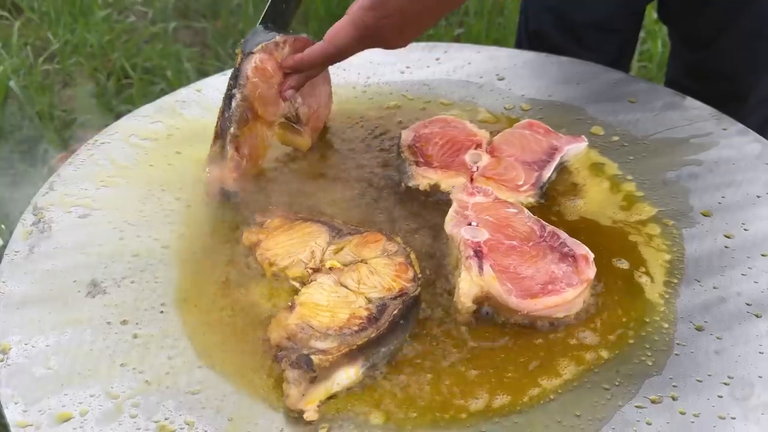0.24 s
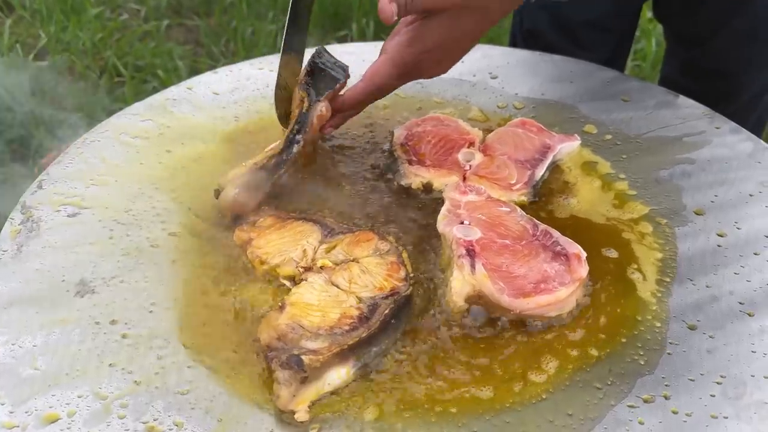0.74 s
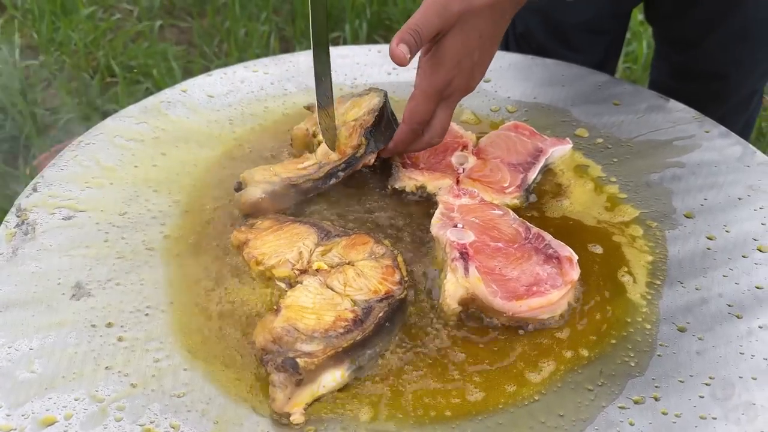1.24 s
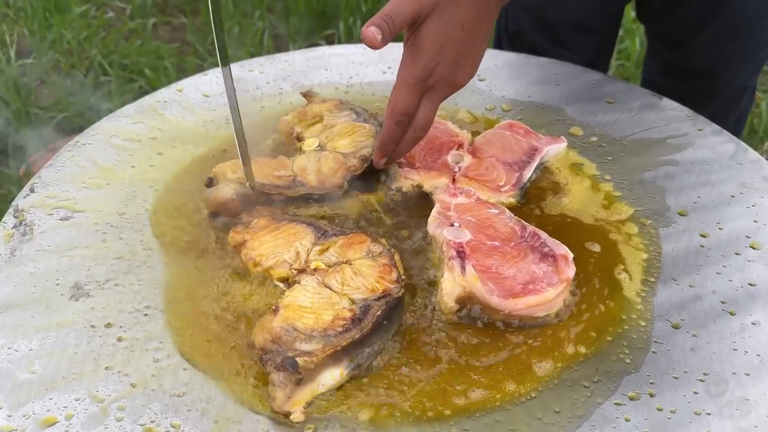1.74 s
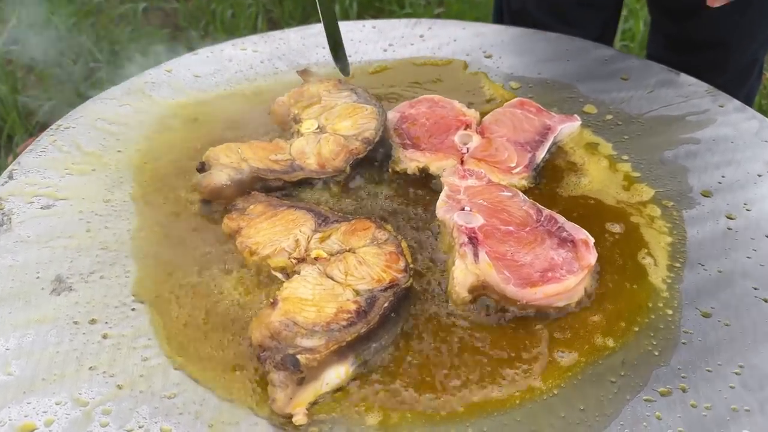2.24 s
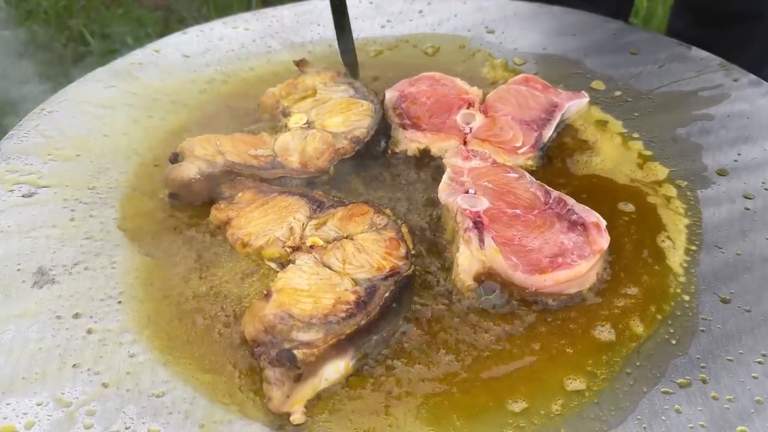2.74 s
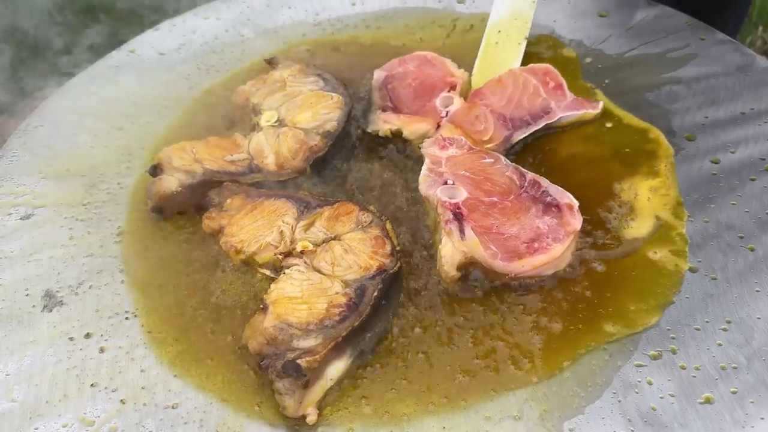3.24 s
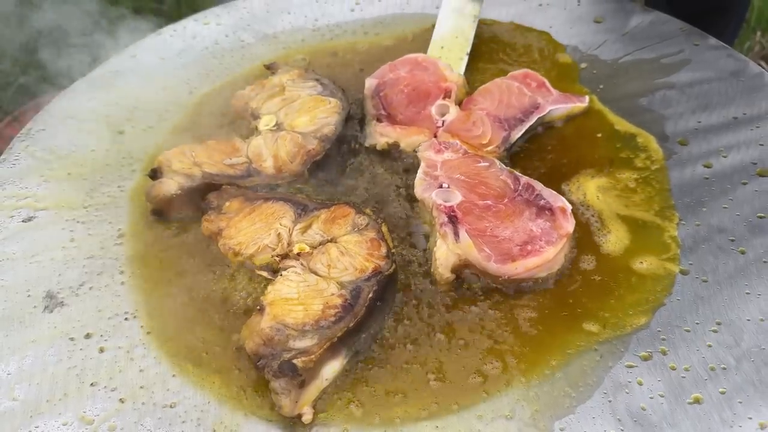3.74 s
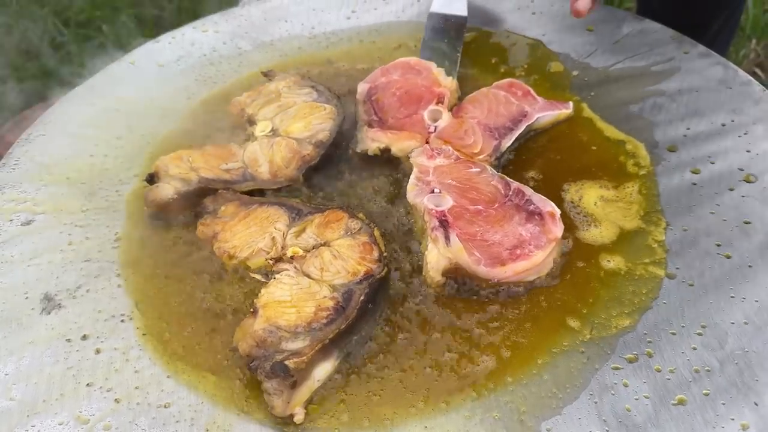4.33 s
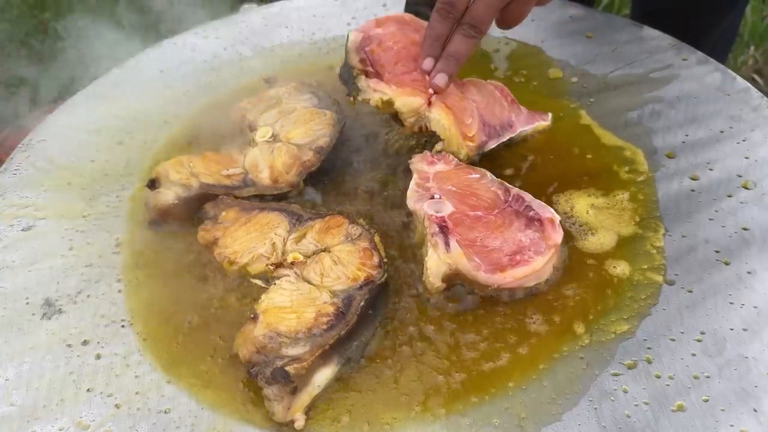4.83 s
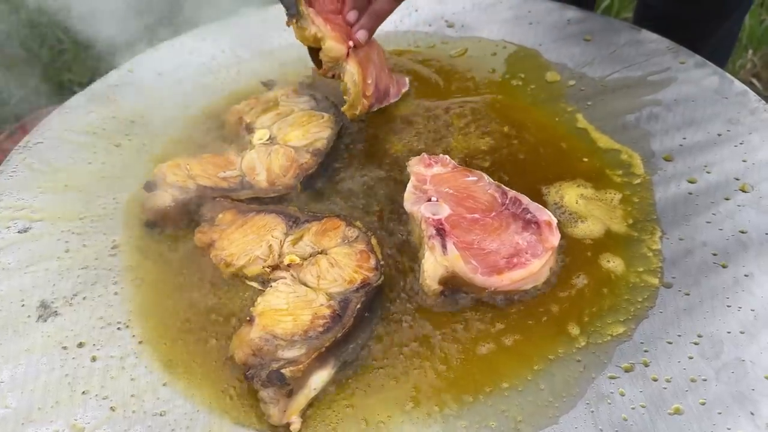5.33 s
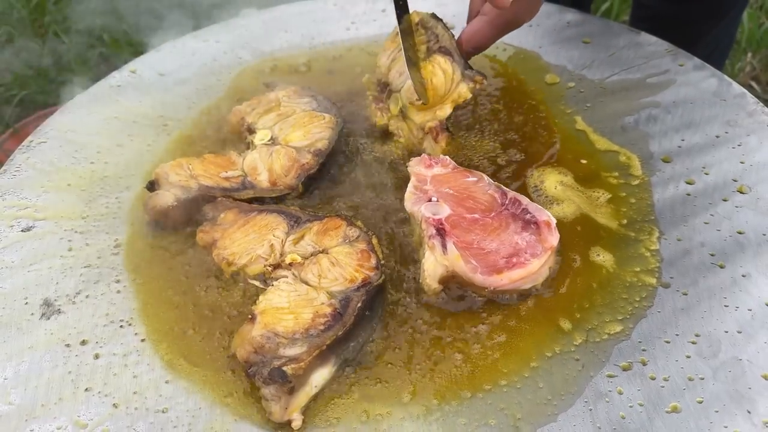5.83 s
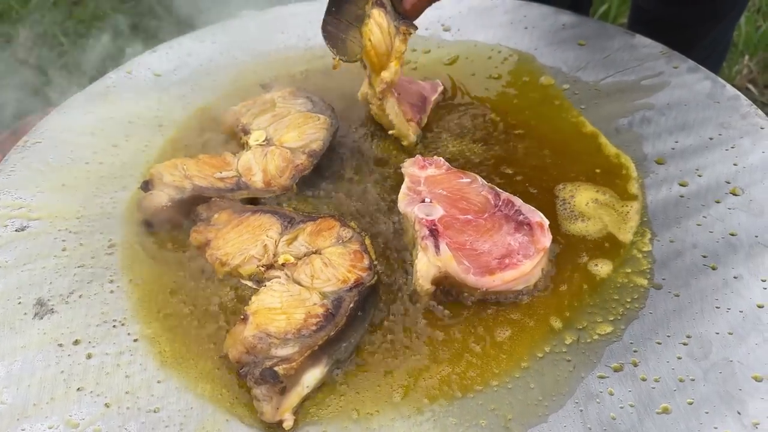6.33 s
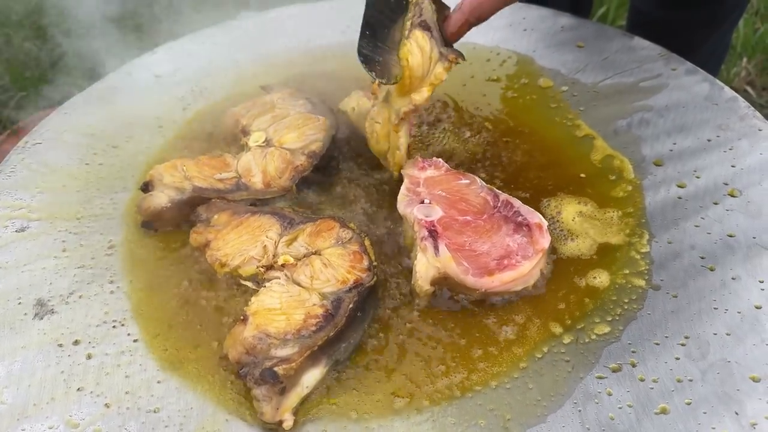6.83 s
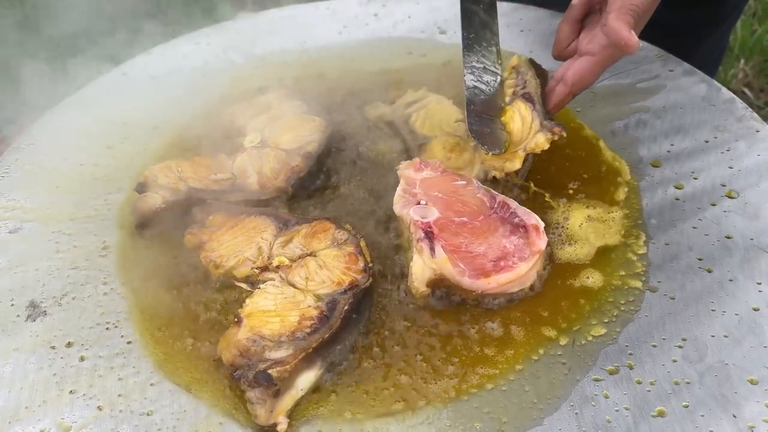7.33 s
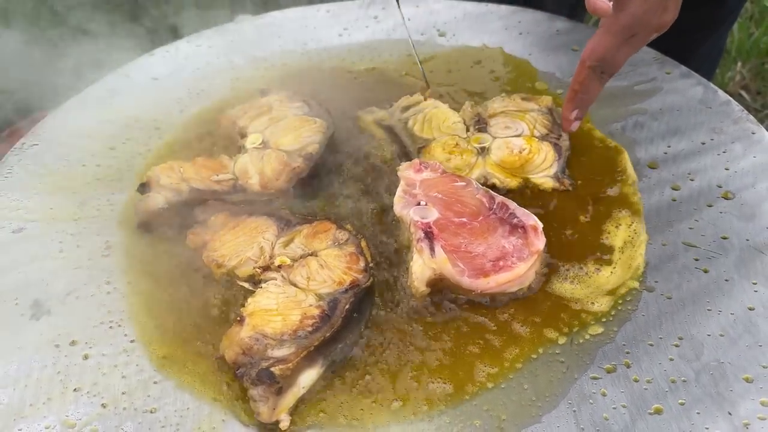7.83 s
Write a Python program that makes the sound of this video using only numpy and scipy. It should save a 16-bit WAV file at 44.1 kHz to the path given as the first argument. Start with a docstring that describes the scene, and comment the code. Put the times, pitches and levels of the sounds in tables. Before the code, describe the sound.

Fish steaks fry in hot oil on an outdoor iron griddle, heard from close by. A dense, bubbling sizzle holds steady for all eight seconds, strongest in the midrange, with a faint high hiss and tiny pings above it. Small wet pops stand out irregularly, many each second, and the bubbling is a little more gurgly around 1 to 1.5 seconds. Oil spits in sharp, bright ticks, mostly during the first 3 seconds, then sparsely, with another cluster from about 7.2 to 7.7 seconds. Light wind buffets the microphone underneath with a low rumble and flutter, swelling into soft thumps around 0.2 to 0.7 seconds, near 1.8, from 4 to 5.3 and around 6.3 seconds. The whole sound dips for an instant at about 0.1 seconds and again at 2.9, fading straight back in. The frying continues to the end.

```python
"""Outdoors at an iron griddle, fish steaks fry in hot oil, close to two microphone ports.
Thousands of steam bubbles burst each second. A few pop out with a wet tail, oil spits, and faint high
pings dot the sizzle, which nearby reflections colour. Wind buffets the ports with rumble, flutter and
soft thumps, under a faint high hiss. Twice the sound drops out for an instant and fades back in."""
import sys
import numpy as np
from scipy import signal
from scipy.fft import rfft, irfft, next_fast_len
from scipy.io import wavfile
from scipy.ndimage import uniform_filter1d

SR = 44100
rng = np.random.default_rng(int(sys.argv[2]) if len(sys.argv) > 2 else 0)


def transcribe(signal):
    """Save signal, clipped to [-1, 1], as a 16-bit WAV file at the path in sys.argv[1]."""
    frames = np.atleast_2d(signal).T
    limited = np.clip(frames, -1, 1)
    pcm = np.round(limited * 32767).astype(np.int16)
    wavfile.write(sys.argv[1], SR, pcm)


N = 355887
FFT_SIZE = next_fast_len(N, True)
HZ = np.fft.rfftfreq(FFT_SIZE, 1 / SR)

# Sizzle fader rides, each taken about its own mean: (time [s], boil [dB], fizz [dB], gurgle [dB])
SIZZLE_RIDES = [(0.0, -23.5, -36.5, -34.5), (0.3, -26.5, -38.5, -31.5), (0.95, -25, -38.5, -31.5),
                (1.06, -26, -39.5, -31.5), (1.15, -25, -39, -30), (1.32, -26.5, -39.5, -32.5),
                (1.5, -25.5, -39.5, -33.5), (1.75, -26.5, -41, -36), (2.1, -26.5, -39.5, -36.5),
                (2.3, -24.5, -39.5, -36), (2.45, -25, -38.5, -37.5), (2.6, -27, -40.5, -36),
                (2.75, -24.5, -39, -36), (2.92, -25, -39.5, -34), (3.0, -26, -37.5, -35.5),
                (3.3, -25.5, -38.5, -35), (3.6, -27, -38, -34.5), (4.0, -27, -39, -34),
                (4.5, -27.5, -38, -35.5), (5.0, -26.5, -38, -35), (5.6, -25.5, -39, -33),
                (6.2, -26.5, -39, -35.5), (6.9, -27, -40, -34.5), (7.5, -27, -39, -36),
                (8.07, -26, -38, -32)]
# Tone of the sizzle at each port: (frequency [Hz], relative level [dB])
LEFT_EQ = [(300, -20.5), (450, -15), (950, -9), (1170, -5), (1300, -1.5), (1650, 0.63), (2100, -5),
           (2800, -9.5), (4000, -17.5), (6000, -22.5), (6500, -23), (6950, -21), (7150, -25), (7800, -24.5),
           (9000, -35.5), (9900, -44.5), (11000, -58.5)]
RIGHT_EQ = [(300, -24), (450, -17), (950, -9.5), (1170, -7), (1300, -3), (1750, 1.3), (2300, -1.5),
            (2900, -9), (4000, -16.5), (6000, -25), (6500, -20), (6950, -23.5), (7150, -23), (7900, -24),
            (8100, -23.5), (9800, -33), (11000, -55.5)]
# How much sizzle the ports share: (frequency [Hz], correlation [0-1])
PORT_CORRELATION = [(450, 0.95), (1000, 0.92), (1400, 0.96), (1900, 0.87), (2400, 0.71), (3050, 0.84),
                    (3500, 0.51), (3900, 0.1), (4300, 0.42), (4750, 0), (5500, 0.53), (6800, 0.75),
                    (7800, 0.16), (8600, 0.51), (9600, 0.04)]
# Right port against left: (frequency [Hz], phase [rad])
PORT_PHASE = [(500, 0), (1000, -0.1), (1400, 0.23), (1800, 0.33), (2080, 0.6), (2250, 0.2), (2420, -1.3),
              (2600, -1.8), (2900, -2.5), (3150, -2.5), (3700, -2), (4300, -2), (5150, -5.5), (5700, -6),
              (6900, -9), (7750, -11.5), (8600, -12.5), (10000, -11.5)]
# Narrow tonal peaks from nearby reflections, before and after the microphone moves:
# (pitch before [Hz], pitch after [Hz], width [Hz], gain before [dB], gain after [dB])
REFLECTION_PEAKS = [(395, 389, 47, 3, 6), (501, 501, 22, -1, 3), (780, 783, 55, -1, 2),
                    (1354, 1200, 54, 0.5, 2), (1710, 2500, 83, 1, 0.1), (2350, 2300, 46, 1.5, 0.5),
                    (2600, 2600, 87, 2, -0.5), (3080, 3055, 90, 4, 2), (3470, 3400, 90, 4, 0.5),
                    (3746, 3630, 78, 3, 3.5), (4450, 4290, 60, 6.5, 3), (4600, 4521, 63, 3, 8),
                    (5140, 4960, 58, 7, 4), (5469, 5286, 63, 5.5, 7), (5830, 5690, 110, 1.5, 3.5),
                    (6070, 6065, 80, 4.5, 3), (6470, 6567, 110, 5, 3.5), (6740, 8600, 150, 2, 1.5)]
# The peaks slide as the hand-held microphone drifts: (time [s], pitch shift [%])
PEAK_DRIFT = [(0.0, 0.5), (0.8, 0.1), (1.6, -0.6), (2.3, -1), (2.93, -1.2), (2.95, -0.5), (3.6, -0.2),
              (4.8, 0.6), (6.1, 1.2), (7.2, 1.6), (8.07, 2.2)]
# Wind bed between gusts: (time [s], rumble level [dB], flutter level [dB])
WIND_BED = [(0.0, -44.5, -49), (0.54, -47, -46), (1.21, -49, -54.5), (1.64, -53, -51.5), (1.82, -48, -47),
            (1.98, -45.5, -48), (3.17, -51, -52), (3.98, -46.5, -48), (4.88, -44, -54.5),
            (5.21, -45.5, -50), (5.66, -52.5, -49.5), (6.38, -48, -50), (7.08, -54, -55.5),
            (8.07, -49.5, -46.5)]
# Gusts on top of the bed: (start [s], length [s], rumble level [dB], flutter level [dB])
WIND_GUSTS = [(0.116, 0.03, -48, -62), (0.213, 0.056, -38, -43), (0.293, 0.044, -48, -51),
              (0.434, 0.03, -45, -44), (0.46, 0.026, -39, -39), (0.533, 0.037, -38, -44),
              (0.653, 0.063, -42, -44), (0.788, 0.049, -39.5, -38), (0.856, 0.044, -39.5, -45),
              (1.21, 0.042, -41.5, -44.5), (1.269, 0.039, -43, -40.5), (1.352, 0.05, -42, -44),
              (1.394, 0.049, -40, -42), (1.668, 0.18, -38, -38), (1.943, 0.037, -51, -52),
              (2.04, 0.029, -42, -59), (2.255, 0.034, -45, -44), (2.457, 0.051, -42, -45),
              (2.726, 0.069, -41, -44), (2.9, 0.043, -42, -49), (4.089, 0.057, -35, -49),
              (4.198, 0.094, -38, -57), (4.358, 0.036, -43, -55), (4.66, 0.22, -39, -51),
              (4.972, 0.03, -47, -52), (5.073, 0.037, -37, -51), (5.156, 0.11, -39, -45.5),
              (5.312, 0.034, -46, -45), (6.26, 0.037, -41, -48), (6.344, 0.049, -37, -40),
              (6.403, 0.042, -47, -54)]
# Tone of the two wind layers and the hiss: (frequency [Hz], relative level [dB])
RUMBLE_EQ = [(12, -46.5), (25, -30), (42, -5), (58, 1), (95, 1.5), (150, -7.5), (260, -61)]
FLUTTER_EQ = [(90, -22.5), (140, 0), (220, -6.5), (330, -11), (550, -17), (900, -62.5)]
HISS_EQ = [(9500, -31.5), (11000, -7), (12000, -10), (15700, 3.5)]
# Bubbles that stand out: (time [s], level [dB], pitch [Hz], length [cycles])
BUBBLE_POPS = [(0.0142, -18, 1660, 4.4), (0.0648, -15.5, 1680, 5.0), (0.0843, -13, 1800, 4),
               (0.1087, -13, 1660, 5.5), (0.19, -15.5, 1960, 4.4), (0.2077, -12, 1540, 5.0),
               (0.324, -15, 1400, 2.9), (0.393, -7.5, 1620, 2.1), (0.4713, -15, 1700, 5.0),
               (0.5, -14, 1660, 7.8), (0.5131, -12.5, 1520, 5.6), (0.5327, -14, 1600, 5.4),
               (0.5958, -12, 1670, 5.6), (0.627, -14, 1610, 4.6), (0.723, -22, 1340, 4),
               (0.751, -13.5, 1230, 5.9), (0.769, -13, 1830, 5.8), (0.836, -8.5, 1480, 4.3),
               (0.919, -16, 1680, 5.0), (0.9775, -9, 1620, 5.0), (1.094, -14, 1760, 5.0),
               (1.0962, -13, 1900, 2.8), (1.0993, -14, 2100, 4.5), (1.118, -13, 1270, 12),
               (1.182, -13.5, 1130, 8.5), (1.2194, -12, 1630, 5.0), (1.2534, -12, 1590, 3.2),
               (1.2695, -9.5, 1570, 3.4), (1.287, -8, 1310, 5.4), (1.318, -13.5, 1410, 8.8),
               (1.3435, -18, 1440, 5.0), (1.365, -10.5, 1250, 5), (1.405, -8, 1620, 3.4),
               (1.426, -10, 1420, 4.8), (1.483, -13, 1650, 3.2), (1.512, -12, 1720, 6.2),
               (1.5411, -11, 1250, 6.2), (1.5753, -17, 1470, 3.3), (1.6452, -11.5, 1450, 5.6),
               (1.6928, -14.5, 1440, 6.5), (1.834, -11, 1590, 3.5), (1.9263, -14.5, 1420, 4.4),
               (1.944, -15, 1470, 5.0), (2.191, -16, 1980, 4.5), (2.2545, -18, 1730, 5.0),
               (2.33, -20, 1990, 3.4), (2.3943, -9, 1710, 4.2), (2.467, -13.5, 1720, 6.7),
               (2.5205, -13, 1610, 5.0), (2.6209, -13.5, 1390, 5.0), (2.677, -15.5, 1300, 4.8),
               (2.8075, -16, 1550, 4.6), (2.8563, -15, 1740, 5.0), (2.876, -14, 2240, 6.0),
               (2.9731, -16, 1750, 5.0), (3.0069, -15, 1390, 6.8), (3.0565, -15, 1680, 5.0),
               (3.194, -11.5, 1680, 6.7), (3.297, -12, 1350, 4.6), (3.348, -14, 1340, 5.4),
               (3.4754, -13.5, 1340, 5.6), (3.5564, -11.5, 1720, 5.0), (3.689, -12, 1530, 4.6),
               (3.7297, -14, 1510, 5.0), (3.8916, -20.5, 1870, 5.0), (4.0264, -17, 1600, 7.5),
               (4.1006, -14, 1710, 5.5), (4.142, -15, 1580, 5.8), (4.1695, -11.5, 1850, 3.5),
               (4.279, -13.5, 1640, 4), (4.4977, -19, 1790, 4.5), (4.578, -11.5, 2080, 5.0),
               (4.6108, -14.5, 1730, 6.6), (4.6863, -21, 1590, 5.0), (4.712, -16, 1610, 7.9),
               (4.739, -15.5, 1670, 4.6), (4.952, -13, 1680, 4.5), (5.008, -9.5, 1560, 4),
               (5.0977, -14, 1800, 5.0), (5.1598, -19, 1740, 4.5), (5.2056, -22, 1830, 3.6),
               (5.339, -19, 1750, 5.0), (5.468, -7.5, 1700, 5.0), (5.5543, -17.5, 1310, 4.4),
               (5.5937, -15.5, 1400, 3.7), (5.6261, -11.5, 1690, 5.0), (5.696, -22, 1780, 5.0),
               (5.7563, -15.5, 1790, 6.1), (5.8124, -14.5, 1700, 4.8), (5.905, -13.5, 1680, 8),
               (6.2007, -14, 1690, 3.5), (6.239, -11, 1680, 6), (6.4188, -14, 1720, 8),
               (6.4428, -17, 1500, 4.4), (6.4964, -11.5, 1840, 3.4), (6.5313, -17, 1660, 3.9),
               (6.5857, -13, 1670, 5.0), (6.61, -11.5, 1320, 5.0), (6.6884, -16.5, 1260, 5.5),
               (6.7332, -10.5, 1810, 3.9), (6.773, -18, 1360, 7.6), (6.838, -12, 1670, 4.5),
               (6.9453, -13, 1640, 5.4), (7.0, -21, 1800, 6.3), (7.147, -17, 1960, 6.9),
               (7.1608, -10, 1460, 4.6), (7.232, -10, 1590, 5.7), (7.3169, -14, 1970, 3.3),
               (7.5281, -11.5, 1640, 5.9), (7.5993, -14, 1790, 4.3), (7.6937, -14.5, 1655, 9.6),
               (7.9008, -12, 1630, 5.0)]
# Sudden dips in level: (time [s], depth [dB], recovery [s])
LEVEL_DIPS = [(0.093, 15.5, 0.034), (2.937, 16, 0.05)]
# Sharp spits of oil: (time [s], level [dB], pitch [Hz])
OIL_SPITS = [(0.1131, -27, 3850), (0.3915, -24, 3800), (0.5463, -23, 3810), (0.626, -15.5, 4260),
             (0.6784, -18, 3780), (0.9438, -21, 3640), (1.0808, -17, 3500), (1.1947, -26, 3620),
             (1.2935, -19, 3500), (1.3139, -26, 3500), (2.0133, -17, 3440), (2.1196, -24, 3810),
             (2.137, -22, 3640), (2.7906, -20, 3440), (2.8384, -20, 3350), (2.856, -21, 3400),
             (2.9786, -21, 4480), (3.8871, -29, 3470), (4.7067, -25, 4270), (7.1748, -15, 3520),
             (7.181, -22, 3720), (7.2005, -26, 3860), (7.5567, -27, 4580), (7.7423, -26, 3660)]
# Puffs that thump the ports: (time [s], level [dB], pitch [Hz], left minus right [dB])
WIND_PUFFS = [(0.227, -26.5, 135, 3), (0.245, -27.5, 210, 3), (0.25, -26, 105, 3), (0.382, -29, 175, 4),
              (0.432, -35, 161, -3), (0.467, -29, 125, 0.5), (0.541, -25, 170, 4), (0.555, -33, 108, 6),
              (0.657, -23.5, 270, -3), (0.663, -27, 398, 8), (0.664, -26, 160, 7), (0.702, -39, 150, -1),
              (0.815, -39, 182, 1.5), (0.953, -36, 172, 2), (1.944, -31.5, 164, -5), (2.463, -32, 130, 2),
              (2.797, -36, 130, 1), (4.634, -29.5, 200, 1), (4.638, -28, 65, 2), (4.705, -32, 90, 2),
              (4.795, -29, 85, 1), (4.838, -34, 110, 1), (5.076, -26.5, 102, 7), (5.19, -33, 80, 1),
              (5.302, -33.5, 121, 1.0), (5.871, -35, 106, 1), (6.257, -31, 243, 6), (6.264, -30, 109, 3),
              (6.282, -39, 140, 3), (6.345, -33, 207, 6), (6.35, -37, 115, 1), (6.361, -32, 182, 5),
              (6.474, -30, 190, 5), (6.757, -33, 187, 3)]


def gain_of(db):
    """Decibels to linear gain."""
    return 10 ** (np.asarray(db) / 20)


def unit_rms(x):
    """Normalises to rms 1."""
    return x / np.sqrt(np.mean(x ** 2) + 1e-20)


def over_spectrum(points):
    """A table's value at every FFT bin, interpolated over log frequency."""
    hz, value = np.transpose(points)
    return np.interp(np.log(HZ + 1), np.log(hz + 1), value)


def automation(rows):
    """One sample-by-sample curve for each value column of a time table."""
    times, *columns = np.transpose(rows)
    return [np.interp(np.arange(N) / SR, times, column) for column in columns]


def wander(hz):
    """Smooth random modulation of rms 1, moving at rates up to about hz."""
    pole = np.exp(-2 * np.pi * hz / SR)
    return unit_rms(signal.lfilter([1], [1, -2 * pole, pole * pole], rng.standard_normal(N)))


def burst(hz, cycles, glide, skew):
    """A sine grain that swells, glides in pitch and dies; lower skew sharpens the attack."""
    progress = np.linspace(0, 1, max(int(cycles * SR / hz), 4))
    envelope = np.sin(np.pi * progress ** skew) ** 2
    return envelope * np.sin(2 * np.pi * cycles * (progress + glide * (progress ** 2 - progress)))


def burst_track(cues, cycles, glide, skew):
    """Lays one grain at each cue: (time [s], level [dB], pitch [Hz])."""
    track = np.zeros(N + SR)
    for (start, db, hz), length in zip(cues, np.broadcast_to(cycles, len(cues))):
        grain = burst(hz, length, glide, skew)
        track[round(start * SR):][:len(grain)] += gain_of(db) * grain
    return track[:N]


def steam_bubbles():
    """Steam bubbles of all sizes burst in clumps: the spectra of two swarms, flat in tone."""
    boil_db, fizz_db, gurgle_db = (ride - ride.mean() for ride in automation(SIZZLE_RIDES))
    clump_db, flicker_db = 0.57 * wander(hz=40), 0.27 * wander(hz=49)
    swarms, power = np.zeros((2, N)), np.zeros(2049)
    for k, hz in enumerate(np.geomspace(280, 11500, num=26)):
        grain = burst(hz, cycles=(4.5, 9.5)[k % 2], glide=0.17, skew=0.68)  # snaps and rounder plops
        power += abs(rfft(grain, 4096)) ** 2 * hz
        small = np.clip(np.log2(hz / 2500), 0, 1)  # small bubbles fizz, large ones gurgle
        large = np.exp(-(np.log2(hz / 1100) / 0.5) ** 2)
        body_db = (1 - large) * boil_db + large * gurgle_db
        ride_db = (1 - small) * body_db + small * (fizz_db + flicker_db)
        busy_db = 1.42 * wander(hz=23)  # each size has its own busy moments
        level = gain_of(ride_db + (1.5 - 0.33 * small) * clump_db + busy_db)
        count = int(480 * hz / 1700 * N / SR)  # 480 a second at 1700 Hz; smaller ones are denser
        for swarm in swarms:
            strength = gain_of(1.12 * np.minimum(rng.exponential(1, count), 5))
            polarity = rng.choice([-1, 1], count)
            triggers = np.bincount(rng.integers(0, N, count), strength * polarity, N)
            swarm += signal.oaconvolve(triggers * level, grain)[:N]
    power = np.interp(HZ, np.fft.rfftfreq(4096, 1 / SR), power + 1e-9 * power.max())
    return rfft(swarms, FFT_SIZE) / np.sqrt(power)


def treble_pings(per_s=160, low_hz=3000, high_hz=6970):
    """Faint, brief high tones scattered at random through the sizzle, softer towards the top."""
    when, height, chance = rng.random((round(per_s * N / SR), 3)).T
    db = -44.5 - 10 * height - 2.5 * np.log(chance + .01)
    hz = low_hz * (high_hz / low_hz) ** height
    return burst_track(np.transpose([when * N / SR, db, hz]), cycles=43, glide=0.02, skew=0.5)


def reflection_colour(x, move_s=2.938):
    """Narrow peaks from nearby reflections slide as the microphone drifts and switch when it moves."""
    hz, t, frames = signal.stft(x, SR, nperseg=2048, noverlap=1536)
    drifted_hz = hz[:, None] / (1 + np.interp(t, *np.transpose(PEAK_DRIFT)) / 100)
    before_hz, after_hz, width_hz, before_db, after_db = np.transpose(REFLECTION_PEAKS)
    grid_hz = np.arange(0, SR / 2, 5)
    responses = []
    for peak_hz, db in ((before_hz, before_db), (after_hz, after_db)):
        peaks = 1 / (1 + 2j * (grid_hz[:, None] - peak_hz) / width_hz)
        responses.append(np.interp(drifted_hz, grid_hz, 1 + peaks @ (gain_of(db) - 1)))
    coloured = frames * np.where(t < move_s, *responses)
    return signal.istft(coloured, SR, nperseg=2048, noverlap=1536)[1][:, :N]


def air_noise(eq, correlation):
    """Shaped noise, only partly shared by the two ports."""
    left, apart = rng.standard_normal((2, FFT_SIZE))
    right = correlation * left + np.sqrt(1 - correlation ** 2) * apart
    return unit_rms(irfft(rfft([left, right]) * gain_of(over_spectrum(eq)), FFT_SIZE)[:, :N])


def gust_envelope(layer, edge_s=0.037):
    """Gusts swell, hold and fall away over the breeze; layer 0 is rumble, 1 is flutter."""
    t = np.arange(N) / SR
    power = gain_of(automation(WIND_BED)[layer]) ** 2
    for start, length, *layer_db in WIND_GUSTS:
        outside_hold = np.maximum(abs(t - start - length / 2) - length / 2 + edge_s / 2, 0)
        power += gain_of(layer_db[layer]) ** 2 * np.exp(-4 * (outside_hold / edge_s) ** 2)
    return np.sqrt(power)


def wind():
    """Wind buffets the ports: a lumpy rumble with a lighter flutter above it."""
    rumble = air_noise(RUMBLE_EQ, correlation=0.73) * gust_envelope(0) * gain_of(1.4 * wander(hz=21))
    flutter = air_noise(FLUTTER_EQ, correlation=0.77) * gust_envelope(1) * gain_of(2.8 * wander(hz=16))
    return (rumble + flutter) * gain_of([[1], [-1]])  # leans left


def hiss(level_db=-66):
    """A faint flickering hiss at the very top, a touch later on the right."""
    white = rfft(rng.standard_normal(FFT_SIZE))
    top = irfft(white * gain_of(over_spectrum(HISS_EQ)), FFT_SIZE)[:N]
    top = unit_rms(top) * gain_of(level_db + 2.5 * wander(hz=30))
    return np.array([top, np.roll(top, shift=16)])


def bubble_pops():
    """Single loud bubbles burst with a slight upward chirp."""
    pops = np.array(BUBBLE_POPS)
    return burst_track(pops[:, :3], cycles=pops[:, 3], glide=0.054, skew=0.85)


def wet_tail(x, t60_s=0.054, wet_db=-3):
    """Each loud burst rings on in a short wet tail of decaying noise, as if reflected off the oil."""
    t, wet = np.arange(2000) / SR, gain_of(wet_db)
    tail = rng.standard_normal(len(t)) * gain_of(-60 * t / t60_s) * (t > .0015)
    tail = wet * tail / np.linalg.norm(tail)
    return (x + signal.oaconvolve(x, tail)[:N]) / np.sqrt(1 + wet ** 2)


def oil_spits(gap_s=0.0026, second_db=-2.5):
    """Oil spits in bright double ticks, the second slightly softer."""
    first = burst_track(OIL_SPITS, cycles=5.5, glide=0.06, skew=0.5)
    return first + gain_of(second_db) * np.roll(first, round(gap_s * SR))


def frying():
    """The sizzle bed and its accents reach two ports that colour and delay them differently."""
    shared, apart = steam_bubbles()
    left_db, right_db = over_spectrum(LEFT_EQ), over_spectrum(RIGHT_EQ)
    bed_eq = gain_of(left_db) * np.clip(HZ / 300, 0, 1) ** 2  # low cut at 300 Hz
    bed_eq *= gain_of(-25.5) / np.std(irfft(shared * bed_eq, FFT_SIZE))
    accents = rfft(wet_tail(bubble_pops() + oil_spits()) + treble_pings(), FFT_SIZE)
    correlation = over_spectrum(PORT_CORRELATION)
    left = bed_eq * shared + accents
    right = bed_eq * (correlation * shared + np.sqrt(1 - correlation ** 2) * apart) + accents
    right *= gain_of(right_db - left_db) * np.exp(1j * over_spectrum(PORT_PHASE))
    return irfft([left, right], FFT_SIZE)[:, :N]


def wind_puffs():
    """Each puff thumps the ports with a few low cycles that sag in pitch."""
    times, db, hz, pan_db = np.transpose(WIND_PUFFS)
    port_cues = [np.transpose([times, db + side * pan_db, hz]) for side in (.5, -.5)]
    return np.array([burst_track(cues, cycles=2.9, glide=-0.41, skew=0.67) for cues in port_cues])


def scene():
    """The stereo mix: frying coloured by nearby reflections, plus wind and hiss."""
    return reflection_colour(frying()) + wind() + wind_puffs() + hiss()


def record(dry):
    """The level drops suddenly and fades back, less deeply in the treble; then a steep high cut."""
    t, dip_db = np.arange(N) / SR, np.zeros(N)
    for start, depth_db, recovery_s in LEVEL_DIPS:
        dip_db += depth_db * np.clip(1 - (t - start) / recovery_s, 0, 1) ** 2 * (t > start)
    dip_db = uniform_filter1d(dip_db, size=8)
    low = signal.oaconvolve(dry, signal.firwin(101, cutoff=3000, fs=SR)[None], "same")
    treble = dry - low
    dipped = low / gain_of(dip_db) + treble / gain_of(0.74 * dip_db)
    high_cut = signal.firwin(511, cutoff=15780, window=("kaiser", 9), fs=SR)
    return signal.oaconvolve(dipped, high_cut[None], "same")


dry = scene()
out = record(dry)
transcribe(out)
```